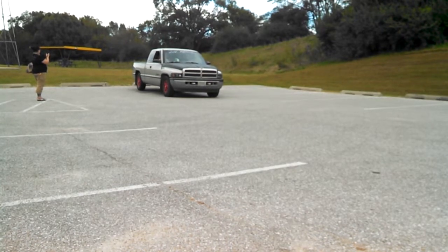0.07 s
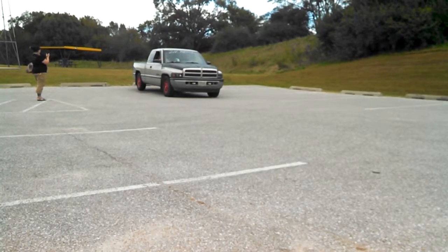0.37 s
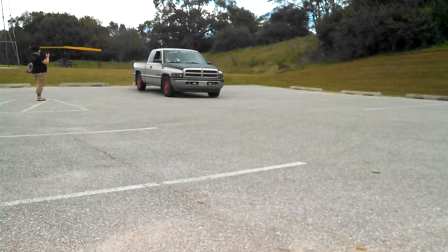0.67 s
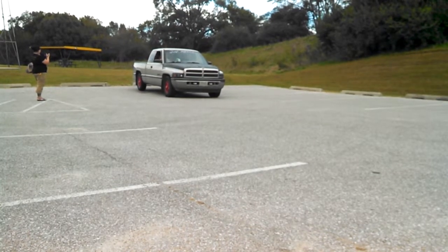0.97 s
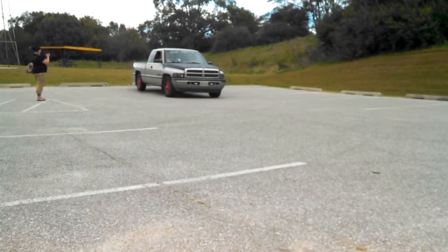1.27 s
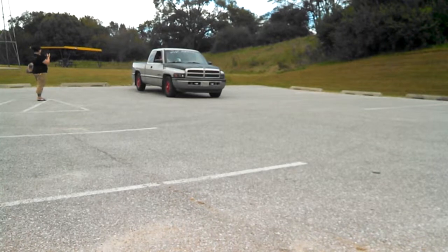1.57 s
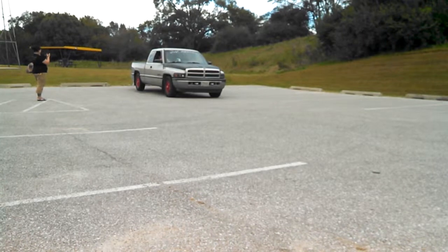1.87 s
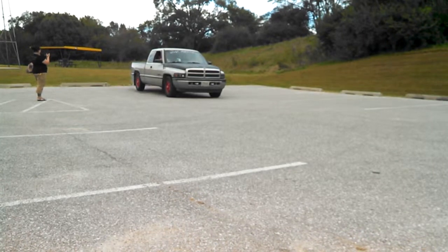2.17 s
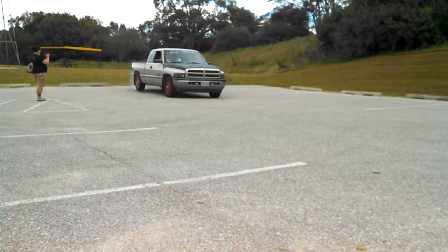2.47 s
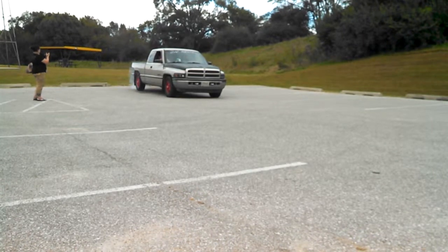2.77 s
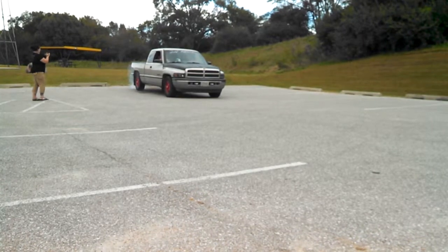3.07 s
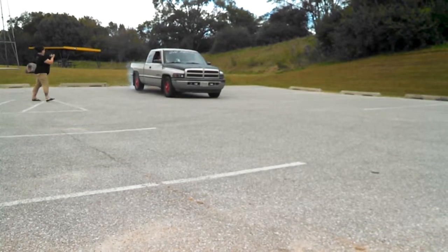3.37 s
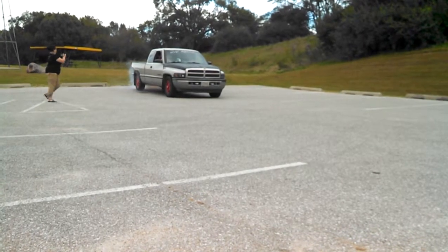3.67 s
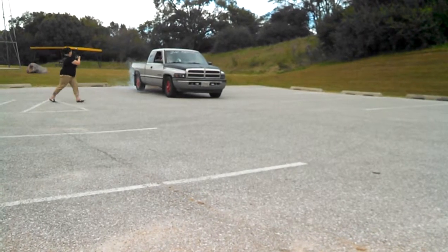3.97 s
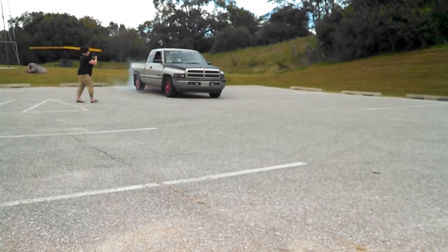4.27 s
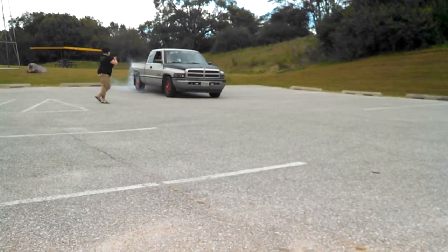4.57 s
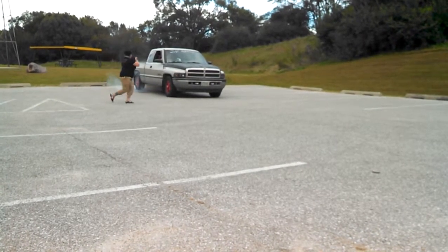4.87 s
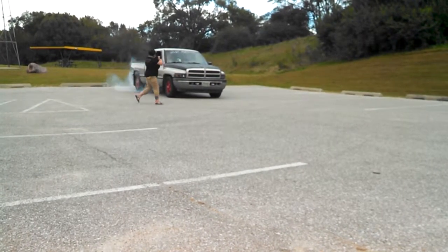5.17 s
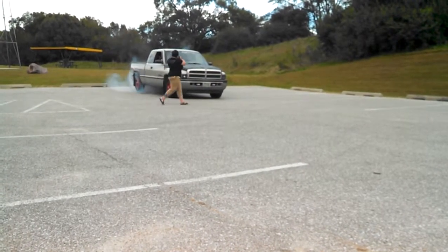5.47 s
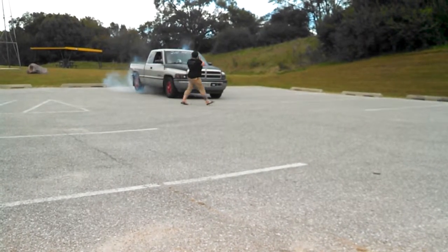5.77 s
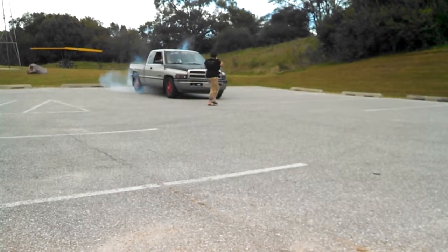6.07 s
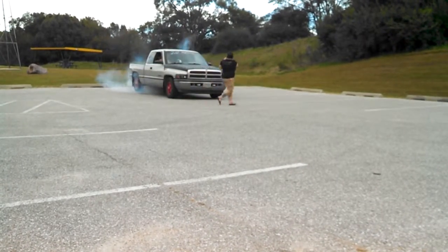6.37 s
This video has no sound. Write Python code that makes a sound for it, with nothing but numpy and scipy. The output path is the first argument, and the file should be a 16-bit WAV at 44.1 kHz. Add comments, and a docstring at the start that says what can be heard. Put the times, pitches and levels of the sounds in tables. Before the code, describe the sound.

Tyres squeal and scrub on asphalt while a throaty truck engine labours, climbs to high revs, then eases off.

```python
"""Pickup burnout in a car park

A V8 pickup, some way off across open asphalt, labours against its brakes, revs up, then eases.
The exhaust lopes at the firing cycle and rasps with every puff; the spinning rear tyres squeal and hiss.
Heard through a close pair of microphone ports of opposite polarity, which makes the sound wide."""
import sys
import numpy as np
from scipy import signal
from scipy.fft import rfft, irfft, next_fast_len
from scipy.io import wavfile
from scipy.ndimage import uniform_filter1d, map_coordinates

SR = 44100
rng = np.random.default_rng(int(sys.argv[2]) if len(sys.argv) > 2 else 0)


def generate_wav(sig):
    """Save sig (samples, or channels by samples) to the path in sys.argv[1] as 16-bit PCM at SR."""
    pcm = np.round(np.clip(np.atleast_2d(sig).T, -1, 1) * 32767).astype(np.int16)
    wavfile.write(sys.argv[1], SR, pcm)


N = 292383
TIME = np.arange(N) / SR


def amp(db):
    """Decibels to gain."""
    return 10 ** (np.asarray(db) / 20)


def unit(x):
    """Scale to rms 1."""
    return x / np.sqrt(np.mean(x ** 2) + 1e-20)


def along(rows, hz, column=1):
    """One column of a table, read on a log-frequency axis."""
    columns = np.transpose(rows)
    return np.interp(np.log(hz + 1), np.log(columns[0]), columns[column])


def curves(rows):
    """One value per sample for each column after the time."""
    seconds, *columns = np.transpose(rows)
    return [np.interp(TIME, seconds, column) for column in columns]


def wobble(rate):
    """A smooth random curve, rate knots a second."""
    knots = rng.standard_normal(int(N * rate / SR) + 4)
    coarse = TIME[::16]
    return np.interp(TIME, coarse, map_coordinates(knots, [coarse * rate]))


def filtered(x, response):
    """x times a complex response of frequency."""
    size = next_fast_len(N + SR // 4)
    return irfft(rfft(x, size) * response(np.fft.rfftfreq(size, 1 / SR)), size)[..., :N]


def noise(spectrum, envelope=1):
    """Noise of rms 1, shaped by the envelope and then coloured by the spectrum."""
    return unit(filtered(envelope * rng.standard_normal(N), lambda hz: amp(along(spectrum, hz))))


# How the engine is driven. Each row: time in seconds, then shares of labouring, climbing and revving.
THROTTLE = [(2.9, 0.95, 0, 0.03), (3.6, 0.05, 0.97, 0.09), (3.95, 0, 0.97, 0), (4.5, 0.01, 0, 0.96),
            (5.25, 0.04, 0, 1), (5.55, 0, 0, 0)]
def drive():
    """Shares of labouring, climbing and revving per sample; the rest, fourth, is easing off."""
    held = np.clip(curves(THROTTLE), 0, 1)
    return np.vstack([held, 1 - held.sum(axis=0)])


def overrun(speed, full_fall_hz_per_s=30):
    """How fast the engine is running down with its throttle shut, 0-1."""
    falling = -np.gradient(speed) * SR
    return np.clip(uniform_filter1d(falling, size=SR // 10) / full_fall_hz_per_s, 0, 1)


# The engine's pace. Each row: time in seconds, four-stroke cycles a second.
ENGINE_SPEED = [(0, 21.93), (0.12, 22.54), (0.3, 23.21), (0.48, 23.9), (0.68, 24.7), (0.85, 25.16),
                (1.4, 25.2), (2, 25.82), (2.3, 25.95), (2.9, 27.21), (3.3, 28.33), (3.9, 31.56),
                (4.2, 34.01), (4.8, 38.07), (5, 39.44), (5.1, 38.74), (5.21, 36.68), (5.34, 31.31),
                (5.46, 26.24), (5.65, 23.17), (5.85, 22.29), (6.22, 23.34), (6.45, 22.63)]
def crank(start_cycles=0.19, hunt_cycles=0.009):
    """Engine speed and cycles completed; without load the crank hunts about its even pace."""
    speed, = curves(ENGINE_SPEED)
    unloaded = drive()[-1] + overrun(speed)
    return speed, start_cycles + np.cumsum(speed) / SR + hunt_cycles * unloaded * wobble(22)


# Puffs in firing order, uneven between the banks. Each row: size in dB, lateness in firing intervals.
PUFFS = [(.3, .03), (.2, -.1), (0, .05), (.1, -.22), (-1.9, .11), (-1.7, -.02), (-4, .21), (4.3, -.23)]
def lope_phase(order, eased):
    """The firing pattern lines the exhaust orders up into a lope once a cycle."""
    size_db, late = np.transpose(PUFFS)
    count = len(PUFFS)
    place = (np.arange(count) + late) / count
    firing = np.angle(np.sum(amp(size_db) * np.exp(-2j * np.pi * order * place)))
    # the muffler spreads each puff out, in a way that changes with the throttle
    spread = (0.42 - 0.34 * eased) * (order - count) ** 2 / count
    return firing + spread


# Brief exhaust blares. Each row: middle and half length in seconds, pitch in Hz, boost in dB.
BLARES = [(0.114, 0.076, 292, 4.5), (0.377, 0.13, 185.8, 5.5), (3.16, 0.15, 332, 5), (4.18, 0.098, 337, 6),
          (4.55, 0.078, 589.4, 7), (4.767, .08, 680, 5), (5.336, 0.079, 256, 6.5)]
def blare_db(hz, width_hz=40):
    """Extra level of an exhaust order as it passes through a blare."""
    coarse_s, coarse_hz = TIME[::64], hz[::64]
    boost = sum(db * np.exp(-((coarse_s - middle) / half) ** 2 - ((coarse_hz - pitch) / width_hz) ** 2)
                for middle, half, pitch, db in BLARES)
    return np.interp(TIME, coarse_s, boost)


# Exhaust harmonics ahead of the pipe. Each row: multiple of the cycle rate, then level in dB
# when labouring, climbing, revving and eased off.
EXHAUST_ORDERS = [(3, -33, -46.0, -36.5, -15), (4, -39, -33.5, -31, -35), (5, -28, -35.5, -36.0, -26),
                  (6, -32, -27.5, -19, -27.5), (7, -42, -26, -23.5, -40), (8, -17.0, -15.5, -19, -14.5),
                  (9, -23, -55, -40, -30.5), (10, -26.5, -29, -30.5, -24.0), (11, -32.5, -28.5, -48, -28.5),
                  (12, -24, -35.5, -31, -42), (13, -26.5, -31, -30, -30), (14, -36.5, -27, -34, -31),
                  (15, -30, -29.5, -36.5, -36.5), (16, -31.5, -30.5, -38, -37.5),
                  (17, -39, -55, -43, -42.5), (18, -34, -36.5, -35, -33.5), (19, -40.0, -49, -42, -40),
                  (20, -42, -39, -43, -30), (21, -37.0, -42, -42.5, -34), (22, -39.5, -41.5, -46, -42),
                  (23, -41.5, -36.5, -42, -39), (24, -45.0, -52.5, -35.5, -43.5),
                  (25, -43.5, -37, -38.5, -39), (26, -42, -36, -41, -41)]
# Resonances of the exhaust pipe. Each row: frequency in Hz, gain in dB.
PIPE_RESONANCES = [(70, -38), (115, -4.5), (135, -2), (160, -6.9), (180, -9), (192, -9.5), (205, -11),
                   (225, -7.5), (245, -1.5), (265, -7.5), (285, -2.4), (300, -0.7), (315, -1.6), (335, 6.5),
                   (355, 3), (375, 1.7), (395, 6.5), (420, 0.2), (450, 5), (487, -9.5), (520, 6),
                   (545, 8.5), (580, 7.5), (620, 5), (675, 10), (740, 3.8), (850, 2.7), (1000, 5)]
def exhaust_note(speed, cycles, flutter_hz=400, rolloff_hz=900, flare_db=3, sag_db=-4, misfire_db=1.5):
    """The orders of the uneven puff train, coloured by the pipe; high ones flutter most."""
    shares, coasting = drive(), overrun(speed)
    free, eased = 1 - shares[0], shares[-1]
    # combustion is even under heavy load, rough once the engine runs free, ragged on the overrun
    ragged = 0.071 + 0.086 * free + 0.31 * coasting
    note = np.zeros(N)
    for order, *levels_db in EXHAUST_ORDERS:
        hz = order * speed
        db = np.dot(levels_db, shares) + along(PIPE_RESONANCES, hz) + blare_db(hz)
        # the upper orders flare as the throttle shuts, then the whole note sags
        db += coasting * (flare_db * (order > len(PUFFS)) + sag_db * eased)
        db += (1 + 0.48 * free) * hz / flutter_hz * wobble(8)  # slow drift
        phase = 2 * np.pi * order * cycles + lope_phase(order, eased)
        rough = ragged * (hz / flutter_hz) ** 2
        tone = (1 + rough * wobble(30)) * np.cos(phase) + rough * wobble(30) * np.sin(phase)
        tone /= np.sqrt(0.5 + rough ** 2)
        note += amp(db) * tone / np.sqrt(1 + (hz / rolloff_hz) ** 8)  # high orders give way to the rasp
    # off the throttle no two puffs are equally strong
    return note * amp(misfire_db * eased * wobble(70))


# Turbulence at the tail pipe. Each row: frequency in Hz, relative level in dB.
RASP_SPECTRUM = [(30, -24), (100, -10.5), (200, -9), (340, -2), (430, -1.5), (490, -9), (560, 0.5),
                 (680, 6.5), (780, -2), (990, 2.5), (1090, -7), (1220, -3), (1700, -23), (3000, -37.5)]
def exhaust_rasp(note, speed, overrun_db=-1, unsteady_db=0.9):
    """Every pressure pulse tears a burst of turbulence from the pipe; the level follows the throttle."""
    throttle_db = np.dot([-22.5, -23.5, -23.5, -24], drive())  # labouring, climbing, revving, eased
    level = amp(throttle_db + overrun_db * overrun(speed) + unsteady_db * wobble(6))
    pulse_power = uniform_filter1d(note ** 2, size=SR // 250)
    mean_power = uniform_filter1d(note ** 2, size=SR // 8)
    pulses = np.sqrt(np.abs(pulse_power / mean_power))
    return level * noise(RASP_SPECTRUM, envelope=1 + pulses)


def bark(cycles, contrast_db=8.5, at_cycles=0.68, width_cycles=0.09):
    """Under load the strongest puff barks once a cycle: a gain of rms 1 for the rasp."""
    offset = (cycles - at_cycles + 0.5) % 1 - 0.5
    labouring = drive()[0]
    gain = amp(contrast_db * labouring * np.exp(-(offset / width_cycles) ** 2))
    return gain / np.sqrt(uniform_filter1d(gain ** 2, size=SR // 4))


# Scrub and hiss of rubber on asphalt. Each row: frequency in Hz, relative level in dB.
SCRUB_SPECTRUM = [(100, -60), (600, -12), (1100, 0.5), (1400, 0.5), (1680, -1.5), (1790, -4.5),
                  (2100, -6.5), (2900, -13.5), (3700, -22.5), (6000, -37)]
HISS_SPECTRUM = [(1500, -11), (2800, 3.5), (3300, 4.5), (3750, -1), (4050, 6), (4200, -2.5), (4400, 3.5),
                 (5500, -3.5), (6050, 4.5), (6600, -3), (7600, -3.5), (8900, -15.5), (11000, -19.5),
                 (13000, -18), (15500, -24)]
# How hard the tyres rub. Each row: time in seconds, gain in dB.
TYRE_FRICTION = [(0, 0.5), (.4, 1.5), (1.6, 3), (1.8, 0.5), (2.7, 1.3), (3, 0), (3.9, 0), (4.2, 3),
                 (5.15, 3.5), (5.9, 0.5), (6.3, 1), (6.63, -1)]
def tyre_noise(scrub_db=-31.5, hiss_db=-36.5, patchy_db=2, grit_db=1.1):
    """Rubber scrubs over the asphalt in shifting patches and grinds out a gritty hiss."""
    spectrogram = signal.stft(noise(SCRUB_SPECTRUM), nperseg=1024)[2]
    patches = uniform_filter1d(rng.standard_normal(spectrogram.shape), size=4, axis=0)
    patches = unit(uniform_filter1d(patches, size=7, axis=1))
    scrub = unit(signal.istft(spectrogram * amp(patchy_db * patches))[1][:N])
    hiss = noise(HISS_SPECTRUM) * amp(grit_db * wobble(300) + 0.93 * wobble(14))
    friction_db, = curves(TYRE_FRICTION)
    return amp(friction_db) * (amp(scrub_db) * scrub + amp(hiss_db) * hiss)


# A thin metallic ring from the truck. Each row: time in seconds, level in dB.
RING_LEVEL = [(3.3, -51), (3.7, -49), (4.5, -46), (5.1, -43), (5.6, -44), (6, -53), (6.2, -42), (6.6, -50)]
def brake_ring(ring_hz=4225, width_hz=130):
    """Rubbing keeps one narrow metal resonance ringing, probably in the dragging rear brakes."""
    level_db, = curves(RING_LEVEL)
    resonance = lambda hz: 1 / (1 + (2 * (hz - ring_hz) / width_hz) ** 2)
    return amp(level_db) * unit(filtered(rng.standard_normal(N), resonance))


def tread(base_hz, squeal_cycles_per_turn=174):
    """Unevenness of the tread, rms 1: the same few patches come round with every turn of the wheel."""
    turns = np.cumsum(base_hz) / SR / squeal_cycles_per_turn
    return unit(sum(np.cos(2 * np.pi * (per_turn * turns + rng.random())) for per_turn in range(3, 9)))


def squeal(hz, patches, patch_db=2, patch_bend=0.009, flicker_db=1.4, damping_hz=1750):
    """Tread sticks and slips: a wavering tone that chatters as the patches pass."""
    waver = (0.018 * wobble(110) + 0.014 * wobble(400))[:len(hz)]
    phase = 2 * np.pi * np.cumsum(hz * (1 + waver + patch_bend * patches)) / SR
    grip = unit(amp(patch_db * patches + flicker_db * wobble(45.4)[:len(hz)]))
    # soft rubber damps the overtone as the pitch climbs
    overtone = amp(-10) / np.sqrt(1 + (2 * hz / damping_hz) ** 16)
    return grip * unit(np.sin(phase) + overtone * np.sin(2 * phase))


# Base pitch of the squeal, which follows wheel speed. Each row: time in seconds, pitch in Hz.
SQUEAL_PITCH = [(0, 800), (.6, 848), (1.18, 875), (2.05, 890), (2.4, 972), (3, 982), (3.4, 1045),
                (3.9, 1212), (4.12, 1248), (4.8, 1430), (5.4, 1570), (5.8, 1269), (6.3, 1360)]
# The rear tyres bite and sing; rows at about 1.2-1.4 times the base pitch are the far tyre, others sing at
# other ratios. Each row: start and length in seconds, level in dB, ratio to the base pitch.
TREAD_BITES = [(0.1, .64, -27, 1.19), (.46, 0.52, -24, 1), (.25, .85, -35, 1.97), (.93, .3, -27, .98),
               (1.08, .22, -22.5, 1.02), (1.3, 0.85, -31, 1), (2.3, .9, -28, 1), (2.42, .3, -29, 1.01),
               (2.75, 0.49, -33, 1.26), (3.25, 0.67, -30, 0.99), (3.75, .52, -27, 1),
               (3.38, 0.55, -34, 1.41), (3.5, .38, -32, .69), (4.4, 0.59, -28, 1), (4.5, 0.52, -39, 1.27),
               (4.58, .42, -30, .71), (4.98, .32, -27, .635), (5.05, 0.4, -35, 0.98),
               (5.2, 0.27, -27, .665), (5.6, 0.2, -26.5, 0.92), (5.95, 0.38, -32, 1), (6.05, .5, -35, 1.2),
               (6.25, 0.41, -29, 0.61)]
def tyre_squeals(attack_s=0.097, release_s=0.14):
    """Each squeal swells, holds and lets go, at a pitch set by the spinning wheels."""
    base_hz, = curves(SQUEAL_PITCH)
    patches = tread(base_hz)
    out = np.zeros(N)
    for start, length, db, ratio in TREAD_BITES:
        span = (TIME >= start) & (TIME < start + length)
        age = TIME[span] - start
        envelope = np.clip(np.minimum(age / attack_s, (length - age) / release_s), 0, 1)
        out[span] += amp(db) * envelope * squeal(ratio * base_hz[span], patches[span])
    return out


# The low end of the exhaust gas. Each row: frequency in Hz, relative level in dB.
RUMBLE_SPECTRUM = [(20, -24), (42, -13), (65, 3), (85, 1), (120, -7), (200, -20)]
def gas_rumble(speed, faint_db=-60, rise_db=21, onset_hz=33.4, full_hz=35.8):
    """Near full revs the rushing exhaust gas adds a low rumble."""
    flow = np.clip((speed - onset_hz) / (full_hz - onset_hz), 0, 1)
    return amp(faint_db + rise_db * flow) * noise(RUMBLE_SPECTRUM)


def surroundings(x, t60_s=0.26):
    """Diffuse scatter from the ground, the bank and the trees around the car park."""
    age = TIME[:SR // 4]
    tail = rng.standard_normal(len(age)) * amp(-60 * age / t60_s)
    return signal.fftconvolve(x, tail / np.linalg.norm(tail))[:N]


# How alike the two microphone ports sound. Each row: frequency in Hz, likeness from 0 to 1.
PORT_LIKENESS = [(30, .8), (100, .98), (600, .96), (1300, .97), (2000, .92), (8000, .91)]
# The right port against the left. Each row: frequency in Hz, gain in dB, extra phase lag in radians.
RIGHT_PORT = [(40, -8, 0.58), (117, -5, 1.12), (250, -7, 1.7), (473, -8.5, 1.36), (493, -8, 0.074),
              (620, -4, 1.47), (764, -9, 0.67), (800, -2, 0.25), (925, -3.5, 0.62), (1280, -2, 0.3),
              (1560, 4.5, 0), (1770, 5.5, 0.82), (2770, 0.5, 0), (5900, 0.5, 0)]
def microphone_ports(left, lag_s=16 / SR):
    """The right port hears the truck later, inverted and in its own colour, with a little scatter."""
    alike = lambda hz: along(PORT_LIKENESS, hz)
    direct = filtered(left, alike)
    scatter = filtered(surroundings(left), lambda hz: np.sqrt(1 - alike(hz) ** 2))
    phase_lag = lambda hz: 2 * np.pi * hz * lag_s + along(RIGHT_PORT, hz, column=2)
    response = lambda hz: -amp(along(RIGHT_PORT, hz)) * np.exp(-1j * phase_lag(hz))
    return np.array([left, filtered(direct + scatter, response)])


def scene():
    """Exhaust, tyres and brakes reach the microphone together from across the car park."""
    speed, cycles = crank()
    note = exhaust_note(speed, cycles)
    exhaust = note + bark(cycles) * exhaust_rasp(note, speed) + gas_rumble(speed)
    tyres = tyre_squeals() + tyre_noise()
    return microphone_ports(exhaust + tyres + brake_ring())


def record(dry, top_hz=15460):
    """The recorder keeps nothing above its band limit."""
    return filtered(dry, lambda hz: hz < top_hz)


dry = scene()
out = record(dry)
generate_wav(out)
```